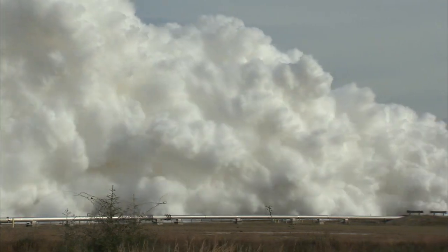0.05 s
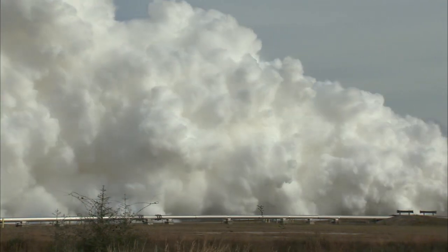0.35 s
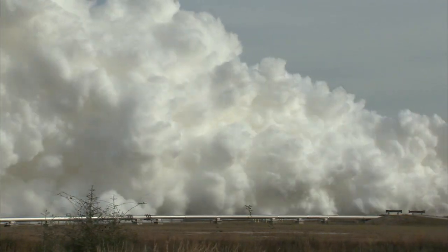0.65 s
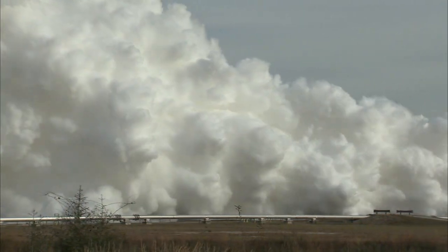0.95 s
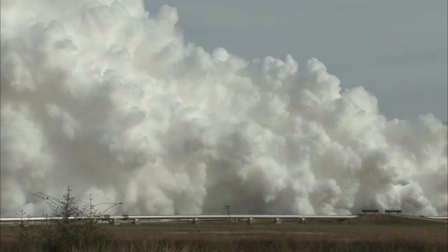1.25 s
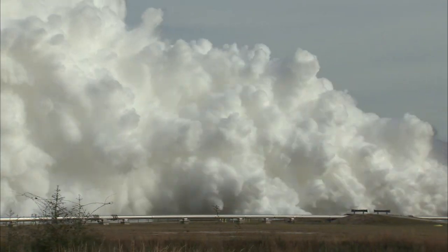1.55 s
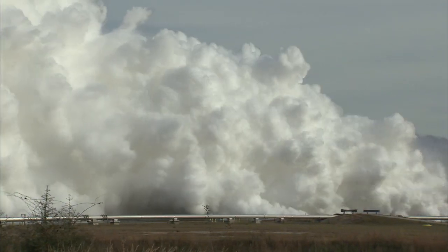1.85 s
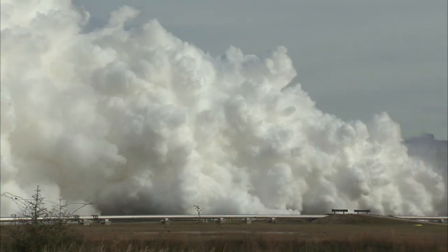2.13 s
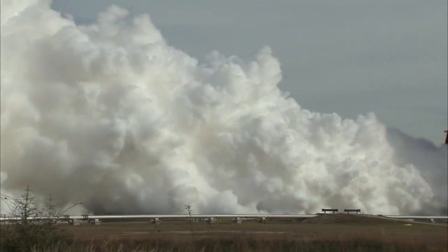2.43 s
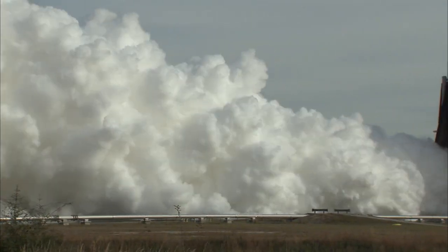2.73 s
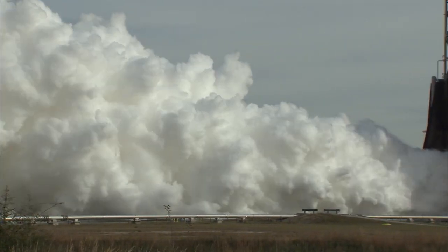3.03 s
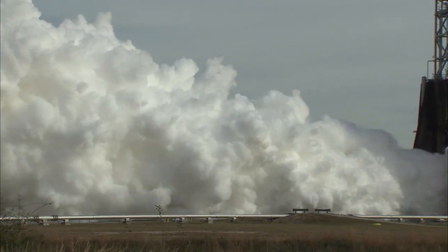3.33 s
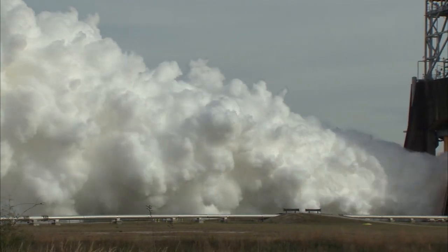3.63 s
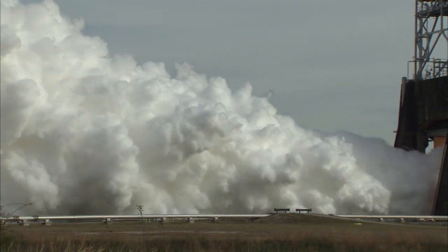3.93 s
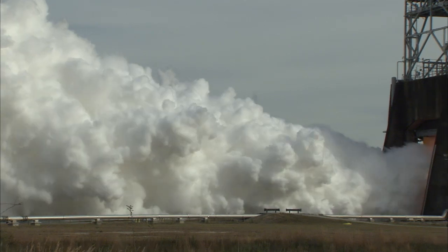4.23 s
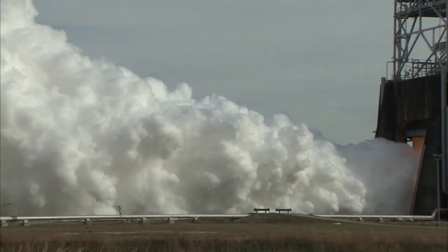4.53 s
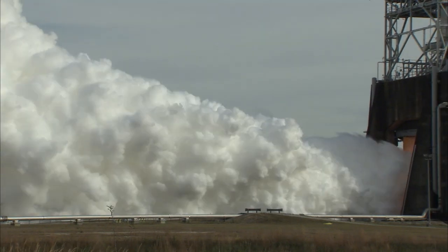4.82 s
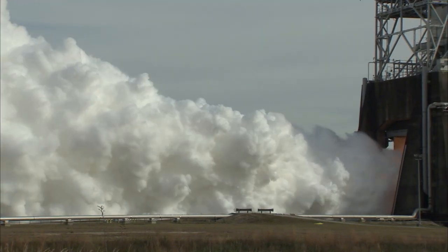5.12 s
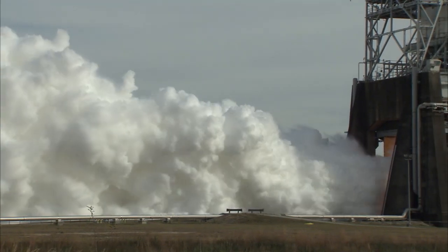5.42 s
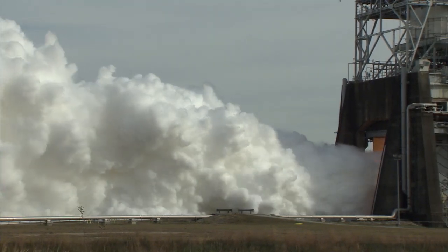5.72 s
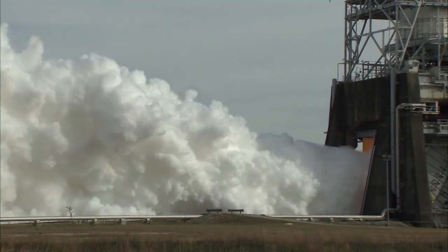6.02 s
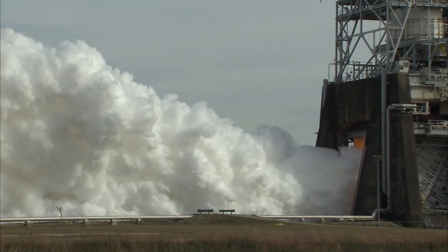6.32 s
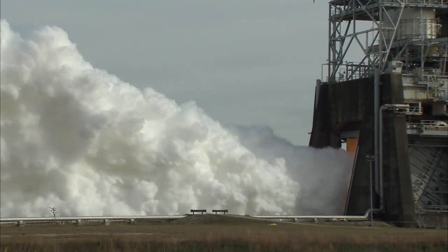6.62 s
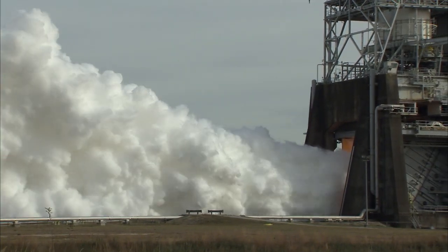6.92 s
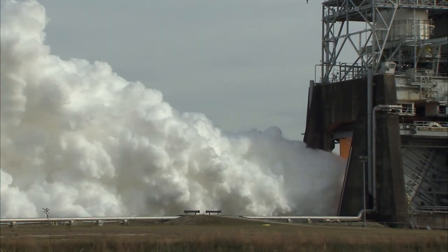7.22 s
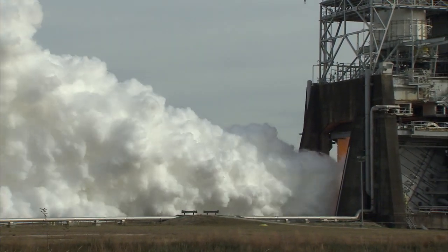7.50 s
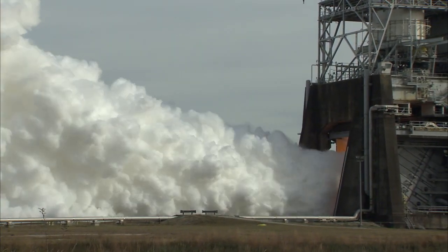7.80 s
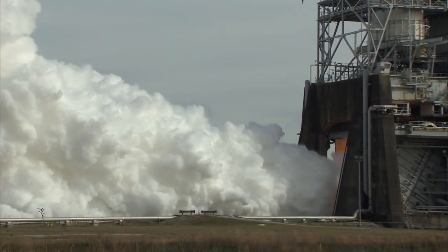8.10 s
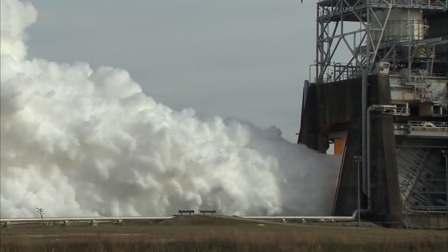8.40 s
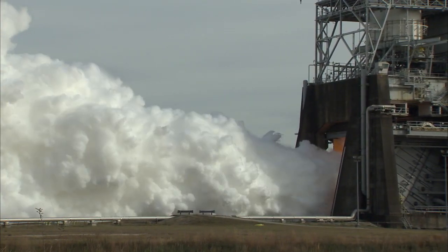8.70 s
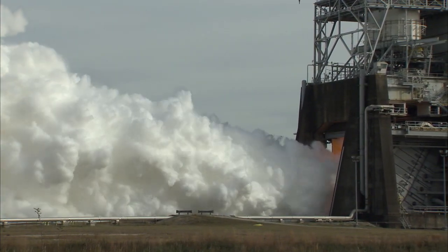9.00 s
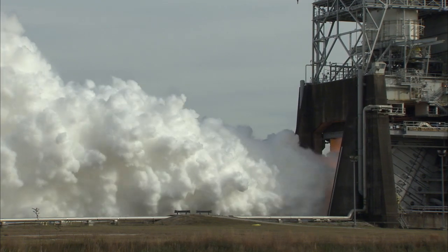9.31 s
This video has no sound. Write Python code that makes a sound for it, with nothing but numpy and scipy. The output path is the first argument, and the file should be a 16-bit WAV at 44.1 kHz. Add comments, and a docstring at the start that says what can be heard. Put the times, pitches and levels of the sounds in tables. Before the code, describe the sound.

A large rocket engine fires steadily in the distance, a deep rushing roar with flurries of sharp crackling.

```python
"""An open field, with a large rocket engine firing steadily on a test stand in the distance.
Swirls of gas (eddies) in its steam plume make the noise: big ones rumble, smaller ones roar and hiss.
The jet's pressure peaks steepen into shocks, sudden jumps in pressure that crackle in flurries,
crack one by one or rip in bunches. Early on, one surge whooshes down in pitch."""
import sys
import numpy as np
from scipy import signal
from scipy.fft import rfft, irfft, next_fast_len
from scipy.io import wavfile
from scipy.ndimage import uniform_filter1d, map_coordinates

SR = 44100
rng = np.random.default_rng(int(sys.argv[2]) if len(sys.argv) > 2 else 0)


def int16_out(signal):
    """Quantize to a 16-bit WAV file."""
    q = np.round(np.clip(np.atleast_2d(signal).T, -1, 1) * 32767)
    wavfile.write(sys.argv[1], SR, q.astype(np.int16))


N = 421155

# The tone of each size of eddy, biggest first: pitch_hz, gain_db
RUMBLE_TONE = [(12, -24), (25, -8), (38, -0.5), (65, 0.3), (100, 0), (150, -2), (210, -7), (300, -19),
               (600, -39.5), (1500, -100)]
ROAR_TONE = [(100, -20.5), (200, -2.5), (290, 1), (460, -0.5), (620, -7), (900, -18.5), (1600, -29),
             (5000, -100)]
RUSH_TONE = [(300, -22.5), (550, 1), (750, 0.5), (1200, -1.5), (1650, -5), (2400, -20.5), (4000, -38.5),
             (8000, -100)]
HISS_TONE = [(500, -20), (1200, -3), (1900, 2), (2600, -1), (3300, -7), (4000, -12), (5000, -20),
             (6300, -31.5), (8000, -45.5), (10000, -60), (14000, -83.5)]
# How loud the three bigger sizes are as time passes: time_s, level_db
RUMBLE_LEVELS = [(0, -19.5), (.8, -18), (1.25, -19), (1.8, -19), (2.5, -18), (3.4, -19), (4.5, -19.5),
                 (6.1, -18.5), (7.35, -17.5), (7.7, -19.5), (8.1, -18), (9.55, -17)]
ROAR_LEVELS = [(0, -23.5), (1.5, -26.5), (1.9, -25), (2.8, -26.5), (3.4, -28.5), (3.85, -27), (4.4, -28),
               (5, -28), (5.8, -28), (7.2, -28), (8.2, -25), (9.55, -24.5)]
RUSH_LEVELS = [(0.0, -25.5), (0.61, -27), (1.28, -25.5), (2.71, -29), (3.24, -28), (5.05, -25.5),
               (5.7, -28.5), (7.26, -29.5), (8.01, -27), (9.55, -26)]
# The jet's strength across the field, which hiss and crackle follow: time_s, strength_db
JET_STRENGTH = [(0.0, -31), (0.45, -30.5), (0.66, -32), (1.65, -33.5), (2.42, -37.5), (2.77, -36.5),
                (3.67, -35.5), (4.23, -35), (5.11, -33), (5.8, -35), (6.22, -34.5), (8.78, -29.5),
                (9.55, -30.5)]
# Spells of harder crackle: middle_s, spread_s, lift_db
CRACKLE_SPELLS = [(1.12, 0.13, 6.4), (2.05, .55, 5.5), (4.8, 0.27, 3), (8.25, .3, 1.6), (9.2, .38, 1)]
# Single strong shocks: time_s, sharpness_db, thump_db
STRONG_SHOCKS = [(.0471, -44, -4), (0.133, -44, -19), (.1629, -45, -16), (.3022, -45, -27),
                 (.327, -34, -20), (.3285, -35.5, -26), (0.3446, -39.5, -22), (.3608, -46, -18),
                 (0.3647, -36.5, -15), (0.405, -44, -20), (0.4216, -38.5, -22), (.4666, -39.5, -9),
                 (0.5018, -43, -13), (.5418, -44, -19), (.6171, -45, -14), (0.6883, -43, -3),
                 (0.709, -45, -22), (0.8327, -44, -17), (.8766, -42.5, -18), (0.9112, -41, -18),
                 (0.943, -42, -18), (0.9633, -42, -19), (0.9783, -43.5, -19), (0.9944, -41, -20),
                 (1.0018, -39.5, -21), (1.0434, -35, -12), (1.0524, -39.5, -17), (1.0702, -39.5, -18),
                 (1.0714, -39, -6), (1.0741, -42, -21), (1.0873, -40.5, -15), (1.0942, -39, -19),
                 (1.1059, -43, -23), (1.109, -44, -17), (1.1266, -40, -18), (1.1488, -39.5, -12),
                 (1.165, -41, -18), (1.1799, -37, -16), (1.1988, -39, -3), (1.2317, -42, -18),
                 (1.243, -40.5, -18), (1.247, -42.5, -15), (1.2548, -40, -17), (1.283, -45, -13),
                 (1.2866, -43.5, -19), (1.3251, -43, -20), (1.3899, -38.5, -16), (1.4655, -43, -28),
                 (1.5311, -45, -25), (1.5685, -44, -25), (1.6336, -44, -20), (1.6485, -40, -17),
                 (1.6668, -38.5, -17), (1.6687, -35.5, -24), (1.6743, -37.5, -19), (1.6778, -40, -9),
                 (1.6816, -40.5, -8), (1.71, -39.5, -20), (1.7148, -39.5, -17), (1.7447, -44, -13),
                 (1.7558, -38.5, -19), (1.8371, -42, -19), (1.882, -40, -5), (1.979, -46, -17),
                 (1.9917, -42, -19), (2.06, -46.5, -20), (2.1692, -38, -14), (2.2285, -47, -11),
                 (2.263, -42.5, -11), (2.295, -47, -19), (2.4408, -45, -20), (2.6272, -45.5, -12),
                 (2.6734, -48, -22), (2.6759, -45, -18), (3.7694, -49.5, -21), (3.8388, -48.5, -14),
                 (4.1968, -48, -21), (5.0926, -38, -9), (5.4627, -49.5, -23), (8.0141, -44, -19),
                 (8.072, -45, -17), (8.402, -47.5, -20), (8.5674, -46, -17), (8.6066, -44.5, -18),
                 (8.8491, -44, -11), (8.9143, -46, -3.5), (8.9217, -42, -15), (8.9624, -45.5, -17),
                 (8.9968, -44, -12), (9.226, -39, -13)]
# Tight bunches of shocks: middle_s, spread_s, sharpness_db, rush_and_hiss_change_db
SHOCK_BUNCHES = [(.335, .03, -58, 2), (1.06, .055, -52, -2), (1.145, .04, -48.5, 0),
                 (1.248, 0.012, -51.5, -2.5), (1.673, .018, -47, 0.5), (1.725, .02, -48.5, 1),
                 (3.2, .025, -57.5, -0.2), (3.82, .05, -52, 0.9), (5.095, .015, -57, .7),
                 (7.85, .03, -52.5, 0), (9.225, .025, -53, 0.5)]
# The tone of the shocks after crossing the field: pitch_hz, gain_db
SHOCK_TONE = [(1200, 0), (2700, 1), (4200, -2), (6100, 0.8), (8000, -1.1), (10500, -2.2), (14000, -0.5)]
# The falling whoosh: time_s, pitch_hz, level_db
SURGE_PATH = [(.9, 560, -46), (1.03, 510, -22.5), (1.12, 489, -24), (1.2, 398.8, -22.5), (1.3, 357, -22.5),
              (1.42, 341, -26), (1.52, 340, -38), (1.65, 330, -70)]
# Bands of plume noise that swell and fade: middle_s, spread_s, pitch_hz, half_width_hz, level_db
BILLOW_BANDS = [(.05, .035, 350, 32, -23), (.34, 0.027, 2090, 900, -30.5), (.67, 0.047, 137, 16, -16),
                (1.12, 0.099, 980, 170, -33), (1.95, 0.25, 134, 27, -22.5), (2.15, 0.033, 1300, 690, -29.5),
                (2.5, 0.18, 36, 11, -27), (3.85, 0.28, 457, 100, -31.5), (4.8, 0.2, 1300, 450, -35.5),
                (5.1, .3, 560, 100, -33), (5.35, 0.15, 100, 24, -22), (6.0, .15, 240, 50, -29),
                (6.45, 0.79, 1290, 390, -34), (6.8, 0.27, 83.7, 23, -22), (7.05, 0.082, 42, 13, -24),
                (7.37, 0.13, 92, 30, -18.5), (7.7, 0.11, 420, 160, -28.5), (8.04, 0.09, 149, 86, -18),
                (8.28, .09, 483, 110, -30.5), (8.9, .6, 243, 59, -30.5), (8.93, 0.099, 1690, 650, -30),
                (9.47, 0.065, 128, 38, -17), (9.5, .08, 296, 50, -27)]


def plume(lopsidedness=0.045, churn_db=0.75):
    """Four sizes of eddy make noise; in so loud a flow, pressure peaks are bigger than the dips."""
    rumble_db, roar_db, rush_db = curves(RUMBLE_LEVELS) + curves(ROAR_LEVELS) + curves(RUSH_LEVELS)
    rip_db = swells([(middle, spread, change_db) for middle, spread, _, change_db in SHOCK_BUNCHES])
    rumble = amp(rumble_db) * eddies(RUMBLE_TONE, patchy_db=-0.3)
    roar = amp(roar_db + churn_db * wobble(8)) * eddies(ROAR_TONE, patchy_db=1)
    rush = amp(rush_db + rip_db) * eddies(RUSH_TONE, patchy_db=0.5)
    hiss_db = -33 + 0.95 * strength_db() + rip_db + 0.19 * wobble(30)
    hiss = amp(hiss_db) * eddies(HISS_TONE, patchy_db=0.5)
    body = rumble + roar + rush
    peaks = rebound(body * unit(body), swing_hz=40, damping=0.74)
    return body + lopsidedness * peaks + hiss


def eddies(tone, patchy_db):
    """The noise of one size of eddy; moving air on the way makes patches of it louder or softer."""
    grid = signal.stft(rng.standard_normal(N), nperseg=1024)[2]  # noise laid out by pitch and time
    patches = uniform_filter1d(rng.standard_normal(grid.shape), size=9, axis=0)
    patches = uniform_filter1d(patches, size=16, axis=1)
    noise = signal.istft(grid * amp(patchy_db * unit(patches)), nperseg=1024)[1][:N]
    return unit(with_tone(noise, tone))


def crackle(count=9000, spread_db=5.0, raggedness=0.3):
    """Many small shocks come at random moments; their sharpness varies more in the hard spells."""
    spell_db = swells(CRACKLE_SPELLS)
    typical_db = -60.5 + 1.35 * strength_db() + spell_db
    times = rng.uniform(0, N / SR, count)
    index = (times * SR).astype(int)
    flurry_db = (typical_db + 0.6 * wobble(13))[index]
    scatter_db = spread_db + raggedness * spell_db[index]
    sharp_db = flurry_db + scatter_db * np.clip(rng.standard_normal(count), -2.4, 2.4)
    spikes = shock_spikes(times, sharp_db, height_db=-14, width_ms=0.085, growth=0.45, narrowing=0.17)
    return rebound(spikes, swing_hz=129, damping=0.78)


def cracks(fall_ms=1.75, fade_ms=3.2, front_ms=0.15):
    """The strongest shocks stand out: each is a spike on a sudden push that falls away into suction."""
    times, sharp_db, thump_db = np.transpose(STRONG_SHOCKS)
    spikes = shock_spikes(times, sharp_db, height_db=-9.4, width_ms=0.076, growth=0.55, narrowing=0.19)
    ms = np.arange(-SR // 50, SR // 50 + 1) / SR * 1000
    after_ms = np.maximum(ms, 0)
    front = (1 + np.tanh(ms / front_ms)) / 2
    thump = front * np.cos(np.pi / 2 * after_ms / fall_ms) * np.exp(-after_ms / fade_ms)
    pushes = np.bincount((times * SR).astype(int), amp(thump_db), N)
    return rebound(spikes, swing_hz=140, damping=0.5) + signal.fftconvolve(pushes, thump, "same")


def rips(shocks_each=40, spread_db=5.0):
    """Now and then shocks arrive in a tight bunch, making a short, bright tearing sound."""
    middle_s, spread_s, typical_db, _ = np.transpose(SHOCK_BUNCHES)[:, :, None]
    chance = rng.standard_normal((len(SHOCK_BUNCHES), 2, shocks_each))
    times = (middle_s + spread_s * chance[:, 0]).ravel()
    sharp_db = (typical_db + spread_db * chance[:, 1]).ravel()
    spikes = shock_spikes(times, sharp_db, height_db=-20.6, width_ms=0.071, growth=0.6, narrowing=0.19)
    return rebound(spikes, swing_hz=160, damping=0.65)


def shock_spikes(times, sharp_db, height_db, width_ms, growth, narrowing):
    """One spike of pressure for each shock: the sharper the shock, the taller and narrower it is."""
    extra_db = np.minimum(sharp_db + 40, 9)[:, None]  # height_db and width_ms apply at sharpness -40
    height = amp(height_db + growth * extra_db)
    width_s = width_ms / 1000 * amp(-narrowing * extra_db)
    nearby = np.arange(-96, 97)
    index = np.round(times * SR).astype(int)[:, None] + nearby
    offset_s = index / SR - times[:, None]
    spikes = height * np.hanning(len(nearby)) / (1 + (offset_s / width_s) ** 2)
    inside = (index >= 0) & (index < N)
    return np.bincount(index[inside], spikes[inside], N)


def rebound(pressure, swing_hz, damping):
    """After each push, the air swings back into a gentle suction."""
    return filtered(pressure,
                    lambda hz: -hz ** 2 / (swing_hz ** 2 - hz ** 2 + 2j * damping * swing_hz * hz))


def surge(half_width_hz=110):
    """The exhaust swells once, with a hollow note that sinks and fades."""
    pitch_hz, level_db = curves(SURGE_PATH)
    flutter_a, flutter_b = noise_band(0, half_width_hz), noise_band(0, half_width_hz)
    phase = 2 * np.pi * np.cumsum(pitch_hz) / SR
    whoosh = flutter_a * np.cos(phase) + flutter_b * np.sin(phase)  # moves low noise up to the pitch
    return amp(level_db) * unit(whoosh)


def billows():
    """For a moment, eddies of one size stand out: low ones throb and high ones rasp."""
    return sum(amp(level_db) * hump(middle_s, spread_s) * unit(noise_band(pitch_hz, half_width_hz))
               for middle_s, spread_s, pitch_hz, half_width_hz, level_db in BILLOW_BANDS)


def strength_db():
    """How far the jet's strength is above or below its average."""
    level_db, = curves(JET_STRENGTH)
    return level_db - level_db.mean()


def swells(rows):
    """Add up smooth level changes, in dB, from rows of middle_s, spread_s, lift_db."""
    return sum(lift_db * hump(middle_s, spread_s) for middle_s, spread_s, lift_db in rows)


def hump(middle_s, spread_s):
    """A smooth rise and fall that reaches 1 in the middle."""
    return np.exp(-.5 * ((np.arange(N) / SR - middle_s) / spread_s) ** 2)


def wobble(rate):
    """A smooth curve through random points, with rate points each second."""
    return map_coordinates(rng.standard_normal(int(N * rate / SR) + 4), [np.arange(N) * rate / SR])


def curves(rows):
    """Join a table's points with straight lines: one curve for each column after the time."""
    times, *columns = np.transpose(rows)
    return [np.interp(np.arange(N) / SR, times, column) for column in columns]


def noise_band(pitch_hz, half_width_hz):
    """Noise gathered around one pitch."""
    return filtered(rng.standard_normal(N), lambda hz: 1 / (1 + ((hz - pitch_hz) / half_width_hz) ** 4))


def with_tone(x, tone):
    """Shape a sound's lows and highs with rows of pitch_hz, gain_db."""
    pitch_hz, gain_db = np.transpose(tone)
    return filtered(x, lambda hz: amp(np.interp(np.log(hz + 1), np.log(pitch_hz), gain_db)))


def filtered(x, response):
    """Multiply each frequency in a sound by response(hz)."""
    size = next_fast_len(N + SR // 2)
    return irfft(rfft(x, size) * response(np.fft.rfftfreq(size, 1 / SR)), size)[:N]


def amp(db):
    """Turn decibels into a number to multiply by."""
    return 10 ** (np.asarray(db) / 20)


def unit(x):
    """Scale a signal so its average size (rms) is 1."""
    return x / np.sqrt(np.mean(x ** 2) + 1e-20)


def scene():
    """Everything comes from the one distant plume, in one channel."""
    shocks = with_tone(crackle() + rips() + cracks(), SHOCK_TONE)
    return (plume() + billows() + surge() + shocks)[None]


def record(dry):
    """Cut away the very highest treble."""
    return np.array([filtered(channel, lambda hz: hz < 14500) for channel in dry])


dry = scene()
out = record(dry)
int16_out(out)
```